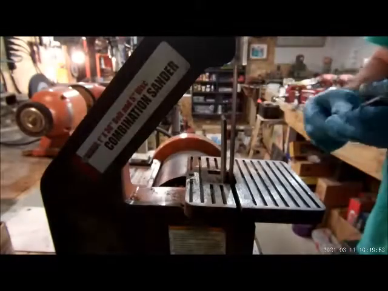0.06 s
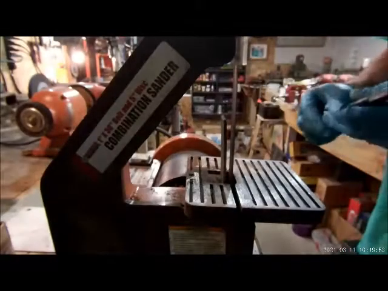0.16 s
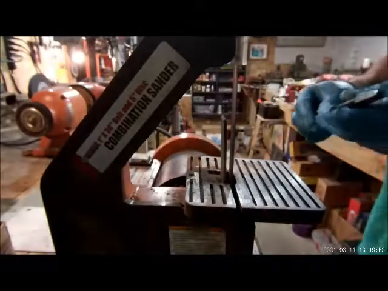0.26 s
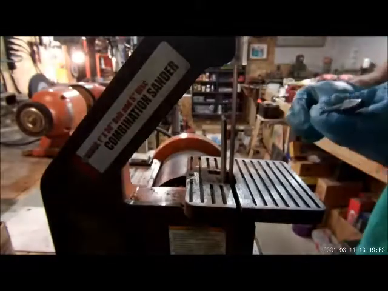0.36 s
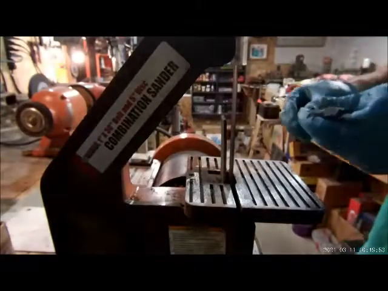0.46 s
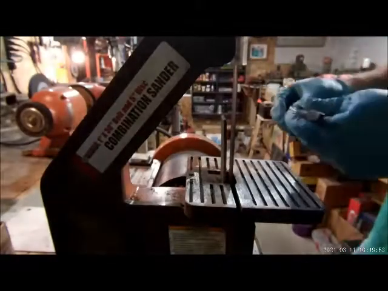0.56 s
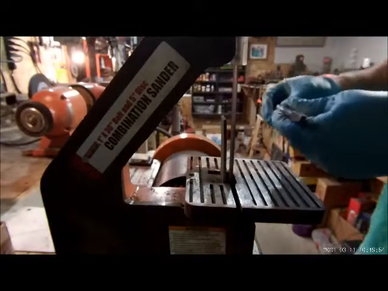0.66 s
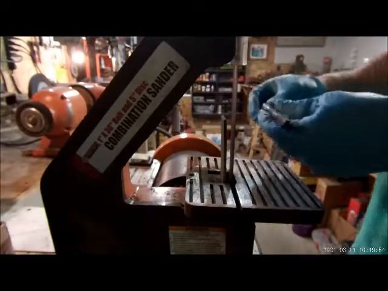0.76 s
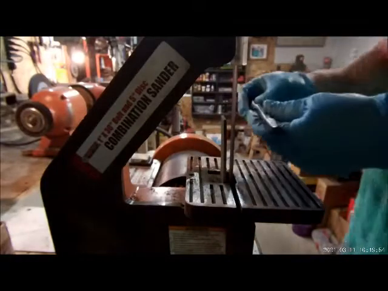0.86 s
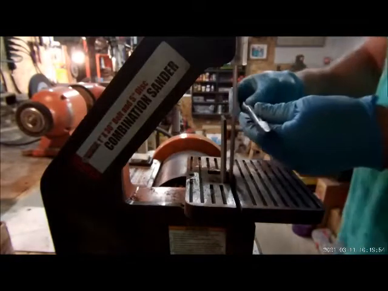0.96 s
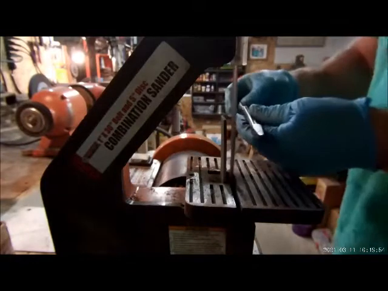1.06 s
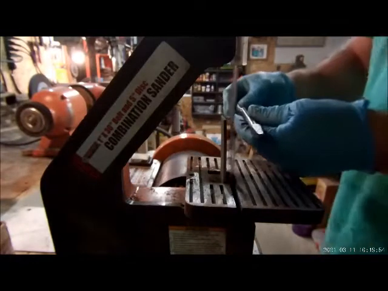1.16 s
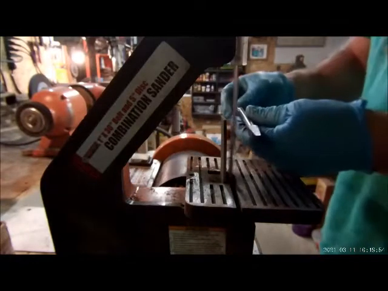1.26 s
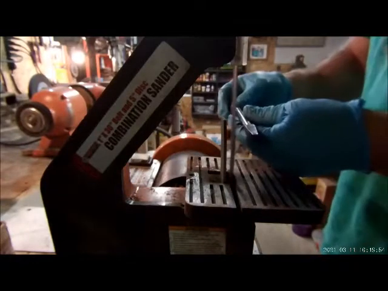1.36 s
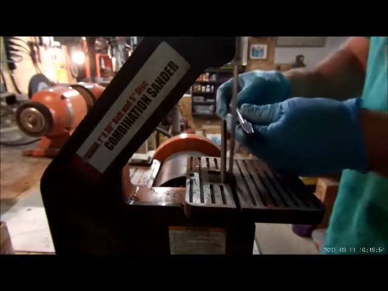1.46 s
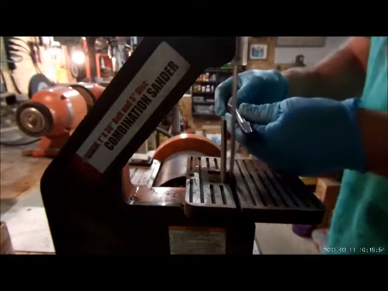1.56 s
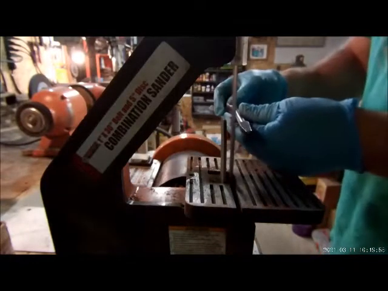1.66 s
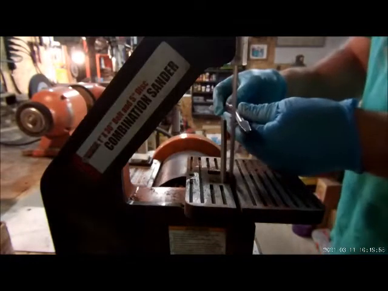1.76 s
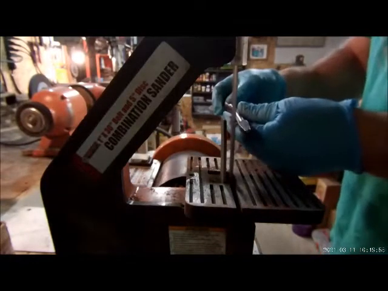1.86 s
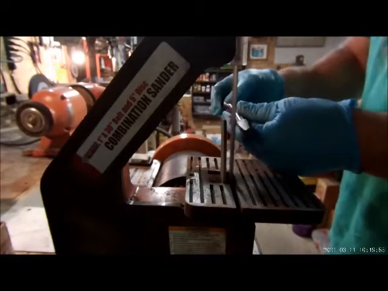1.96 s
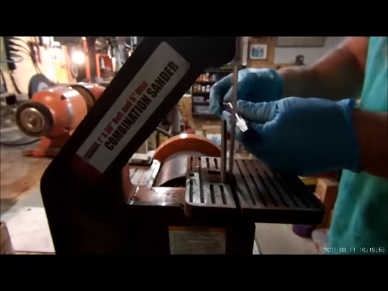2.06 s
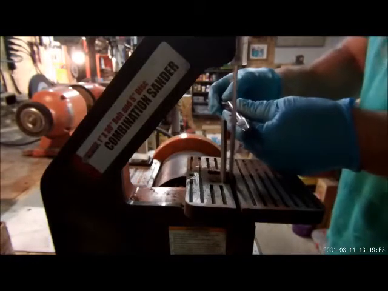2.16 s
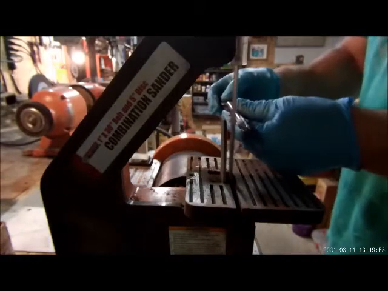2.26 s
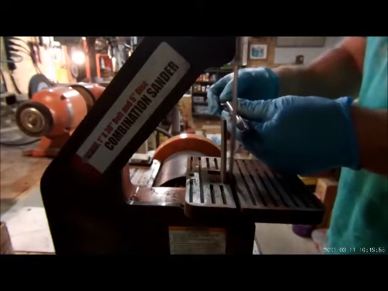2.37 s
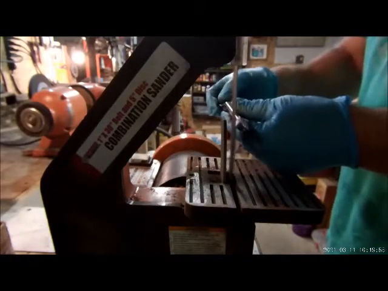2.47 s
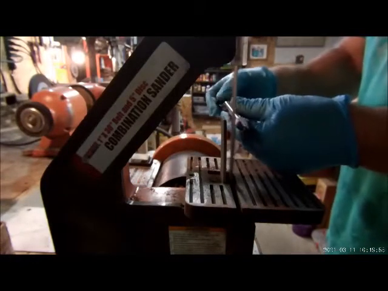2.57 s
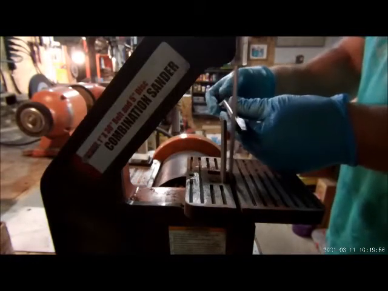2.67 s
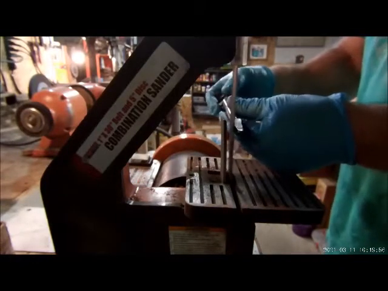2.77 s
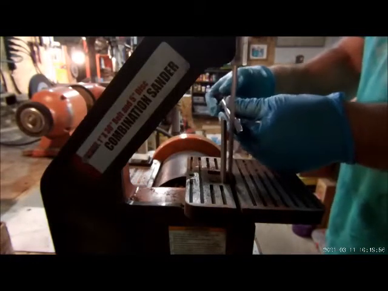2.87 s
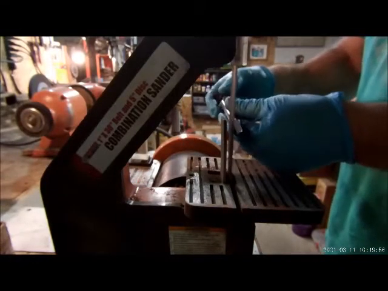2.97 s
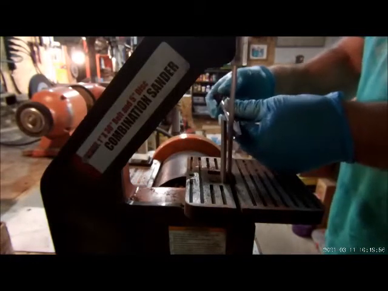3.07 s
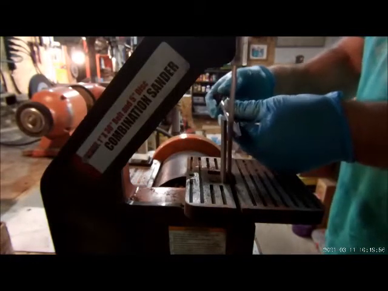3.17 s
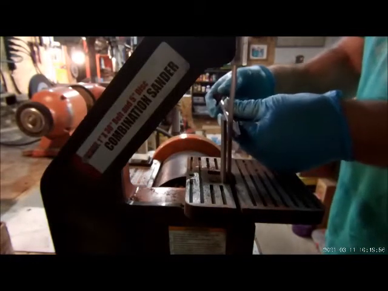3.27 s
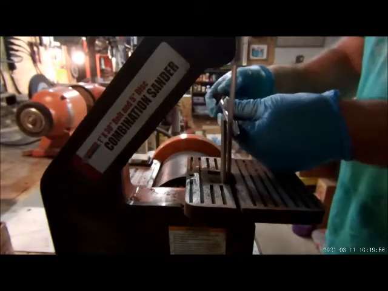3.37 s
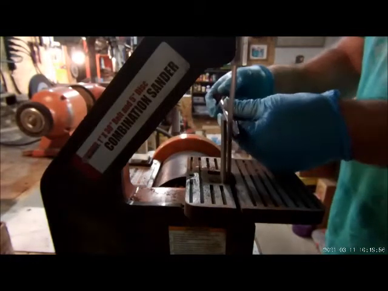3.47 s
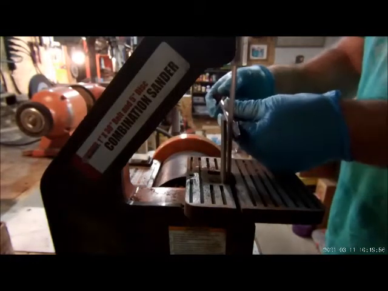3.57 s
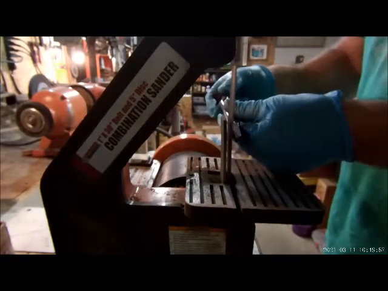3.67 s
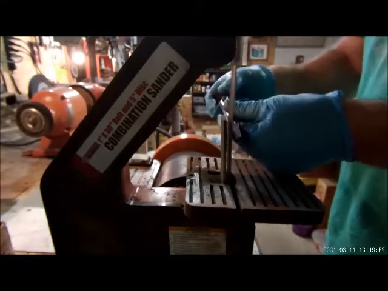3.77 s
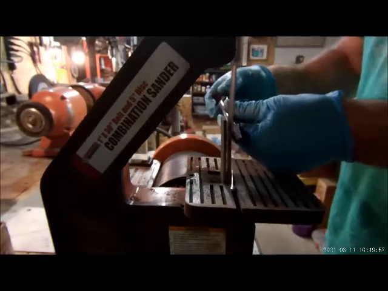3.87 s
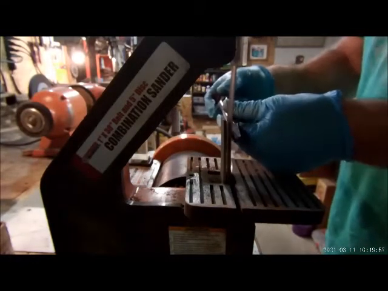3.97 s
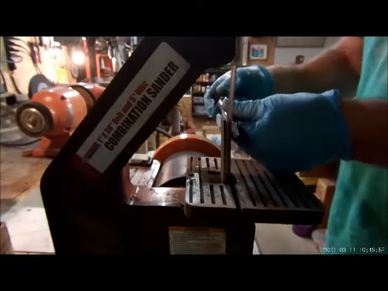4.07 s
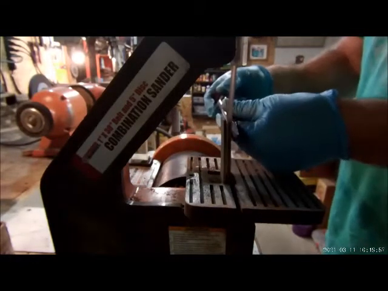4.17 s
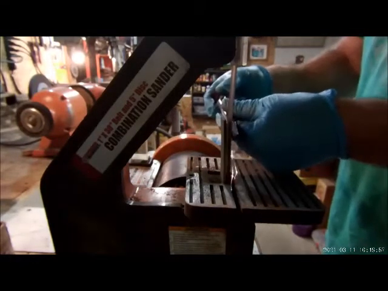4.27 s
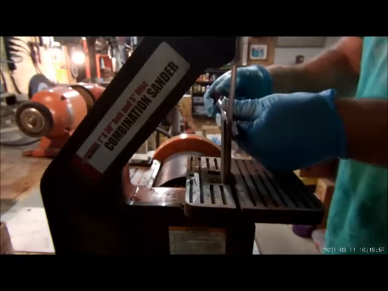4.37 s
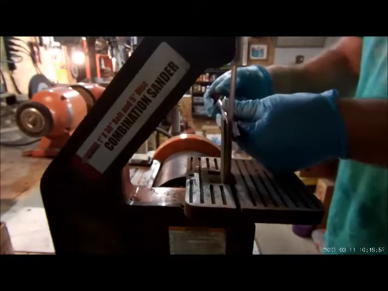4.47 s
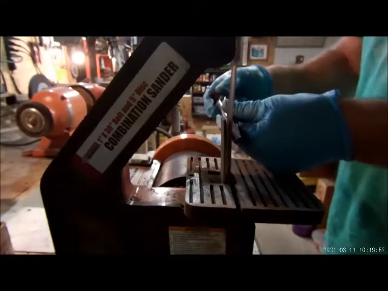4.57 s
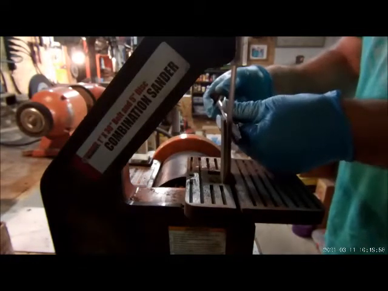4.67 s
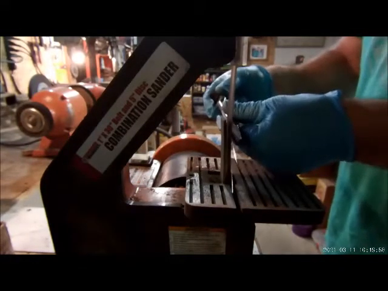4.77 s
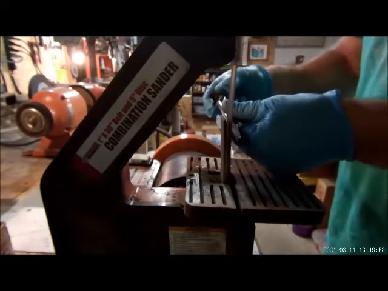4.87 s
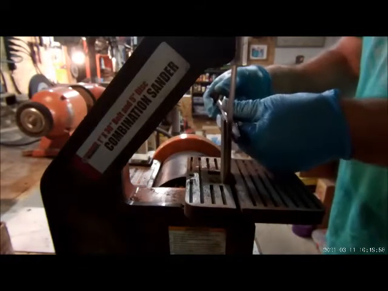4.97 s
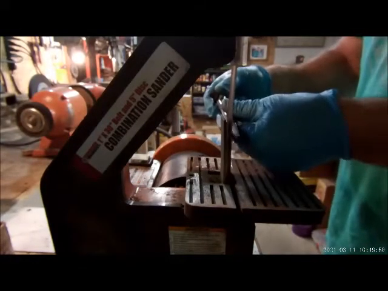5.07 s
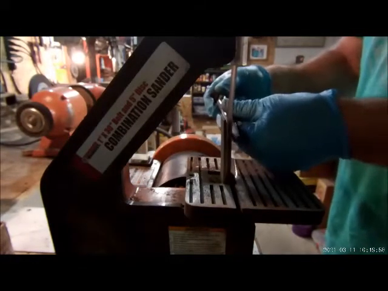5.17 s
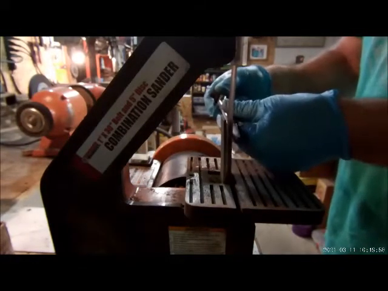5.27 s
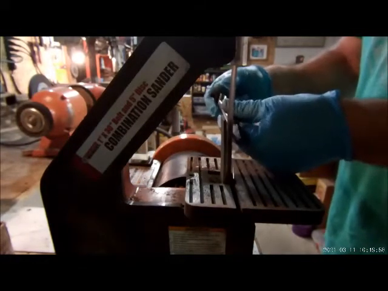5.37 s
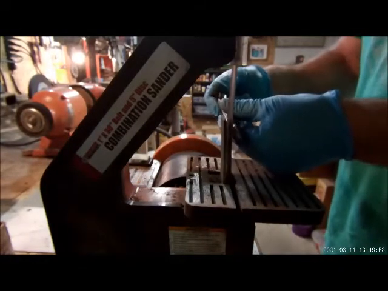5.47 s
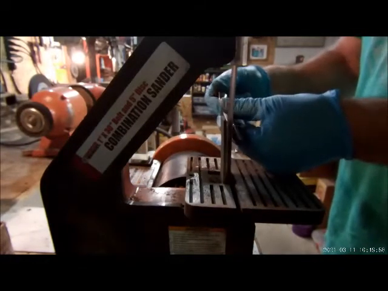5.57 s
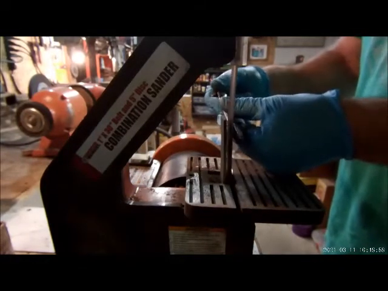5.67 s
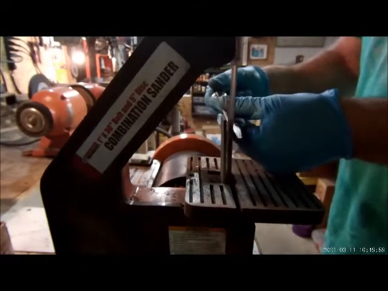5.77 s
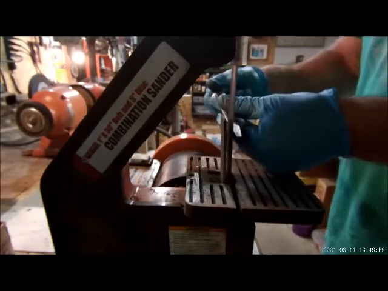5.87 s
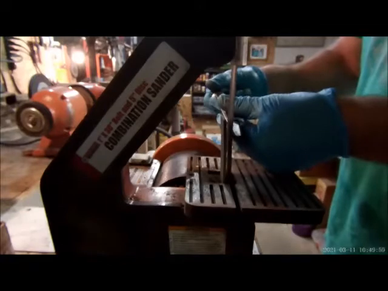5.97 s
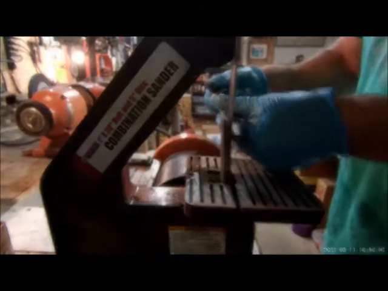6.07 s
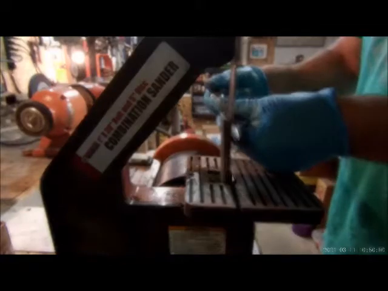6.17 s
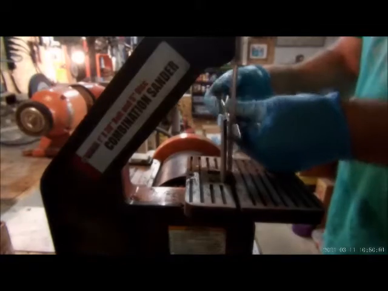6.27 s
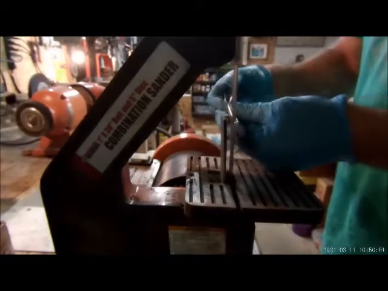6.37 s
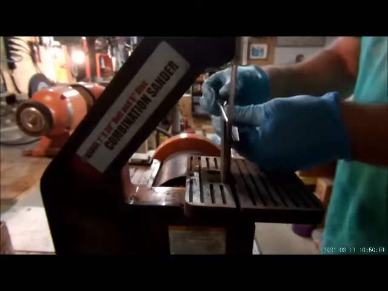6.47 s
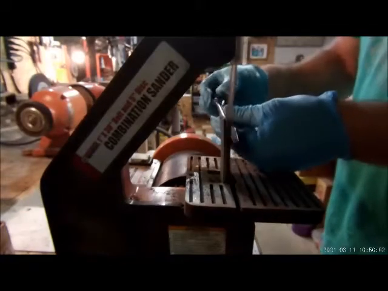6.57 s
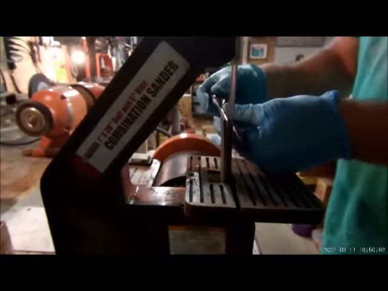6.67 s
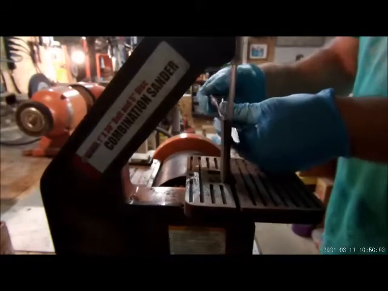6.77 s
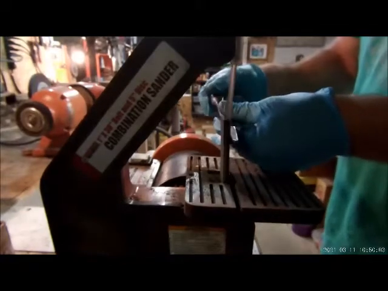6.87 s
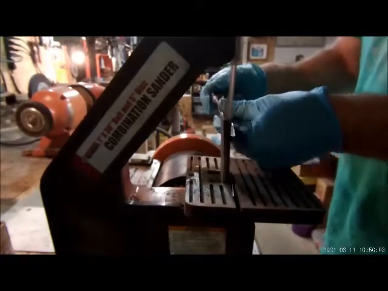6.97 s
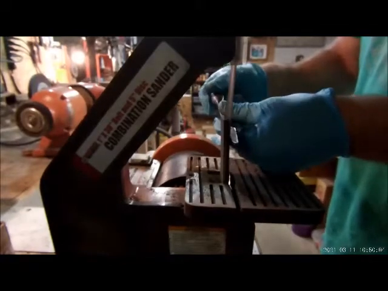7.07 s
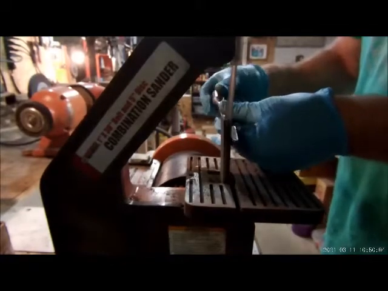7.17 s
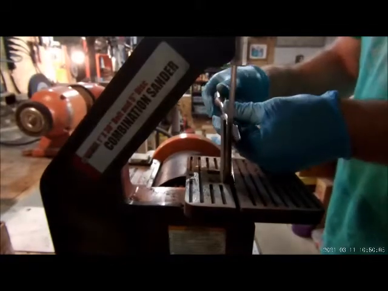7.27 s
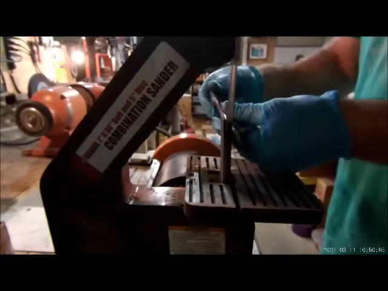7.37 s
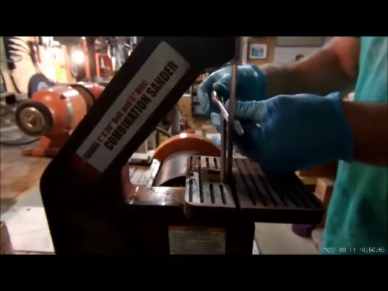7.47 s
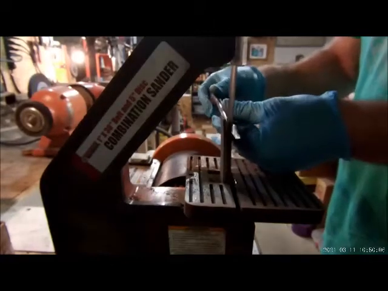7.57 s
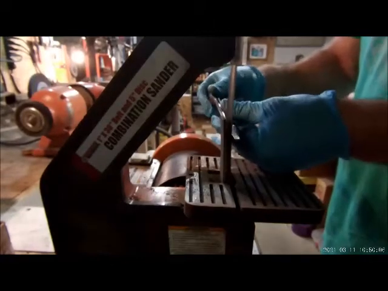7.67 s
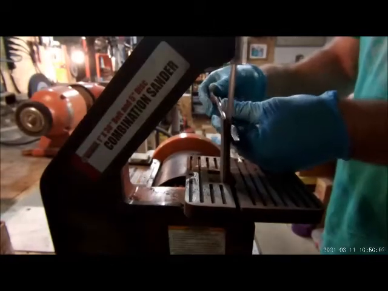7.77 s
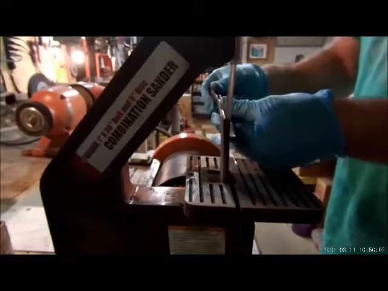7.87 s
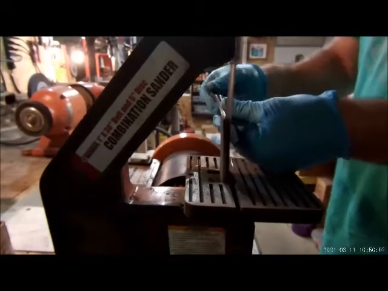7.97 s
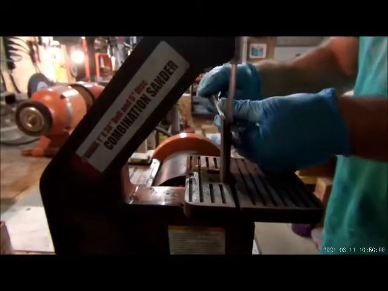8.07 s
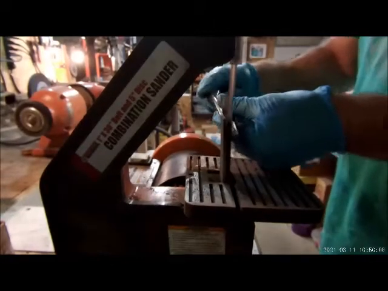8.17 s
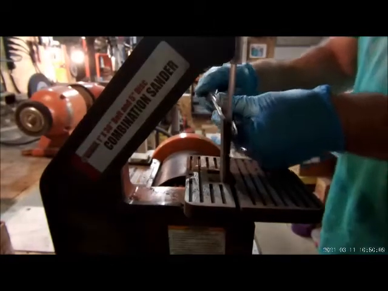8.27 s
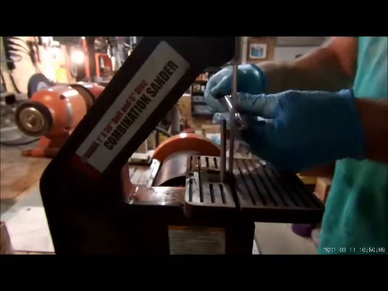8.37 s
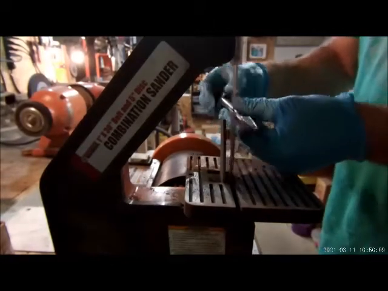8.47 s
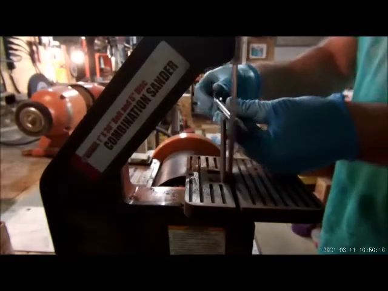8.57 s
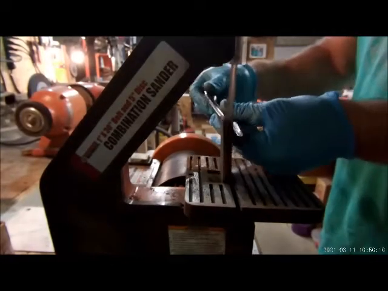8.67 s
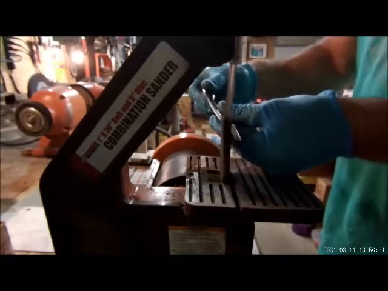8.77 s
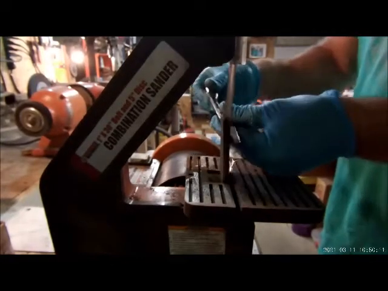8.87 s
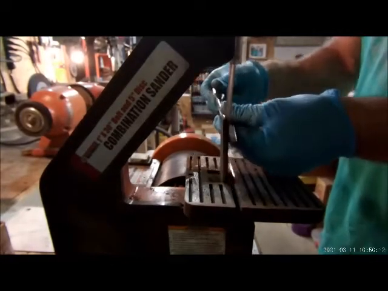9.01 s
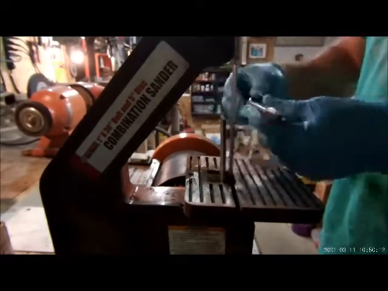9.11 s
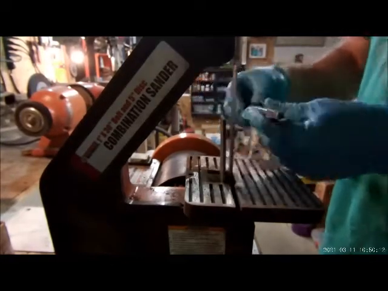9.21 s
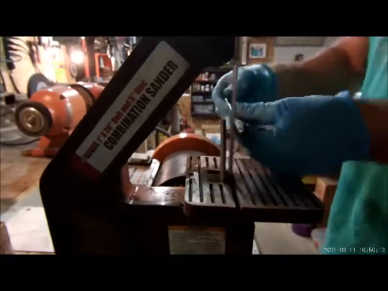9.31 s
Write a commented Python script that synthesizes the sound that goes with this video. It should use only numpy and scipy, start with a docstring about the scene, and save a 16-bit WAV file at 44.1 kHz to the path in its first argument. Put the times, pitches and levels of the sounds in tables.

```python
"""In a workshop, a benchtop belt and disc sander starts up. Its drive knocks once a turn, exciting the
frame's resonances, faster and faster until the knocks fuse into a rattling harmonic drone. The free
belt flaps briefly; then a steel shank is laid on it, loading the motor and hissing as grit scratches it.
Near the end the loaded machine is heard in fast motion, four times as quick and as high; the two
overlap for half a second, then the sound at natural pace is cut off."""
import sys
import numpy as np
from scipy import signal
from scipy.fft import rfft, irfft, next_fast_len
from scipy.io import wavfile

SR = 44100
rng = np.random.default_rng(int(sys.argv[2]) if len(sys.argv) > 2 else 0)


def write(x):
    x = np.atleast_2d(x).T
    wavfile.write(sys.argv[1], SR, np.round(np.clip(x, -1, 1) * 32767).astype(np.int16))


N = 411894
T = np.arange(N) / SR
PADDED = next_fast_len(N + SR // 2)
HZ = np.fft.rfftfreq(PADDED, 1 / SR)

FREE_HZ, LAPS_PER_TURN = 59.13, 1 / 8  # unloaded turning rate; belt laps per motor turn
FIRST_KNOCK_S, FUSE_S = 0.079, 1.188
FAST_PACE = 4


def amp(db):
    """Amplitude ratio of a level in decibels."""
    return 10 ** (np.asarray(db) / 20)


def unit(x):
    """Normalisation to rms 1."""
    return x / np.sqrt(np.mean(abs(x) ** 2) + 1e-20)


def curves(rows):
    """Linear interpolation of each column over time."""
    times, *columns = np.transpose(rows)
    return [np.interp(T, times, column) for column in columns]


def spectrum(points, hz):
    """Interpolation of levels [dB] on a logarithmic frequency axis."""
    frequencies, db = np.transpose(points)
    return np.interp(np.log(hz + 1), np.log(frequencies + 1), db)


def bell(hz, centre, width):
    """Lorentzian power response of one resonance."""
    return 1 / (1 + (2 * (hz - centre) / width) ** 2)


def radiation(corner_hz):
    """Radiation efficiency: a small body gives off little sound below its corner frequency."""
    return HZ ** 2 / (HZ ** 2 + corner_hz ** 2)


def coloured(x, gain):
    """Minimum-phase filtering, scaled so that white noise keeps its power."""
    cepstrum = irfft(np.log(np.maximum(unit(gain), 1e-6)), PADDED)
    cepstrum[1:PADDED // 2] *= 2
    cepstrum[PADDED // 2 + 1:] = 0
    return irfft(rfft(x, PADDED) * np.exp(rfft(cepstrum)), PADDED)[:N]


def wander(per_s):
    """Random modulation of rms 1, with per_s new values a second."""
    knots = np.arange(0, T[-1] + 1, 1 / per_s)
    return unit(np.interp(T, knots, rng.standard_normal(len(knots))))


def fade_in(centre_s, length_s):
    """Raised-cosine step from 0 to 1."""
    return .5 + .5 * np.sin(np.pi * np.clip((T - centre_s) / length_s, -.5, .5))


def motor_speed(load, pull_hz=16.58, surge_hz=19.15, sag_hz=0.52):
    """Turning rate [Hz]: torque pulls steadily, then surges; load (1 is normal) lowers the top speed."""
    return np.minimum(pull_hz * T + surge_hz * T ** 4, FREE_HZ - sag_hz * load)


# Spectral envelope of the frame: (frequency [Hz], level [dB])
FRAME_COLOUR = [(18, -75), (30, -67.5), (303, -31), (426, -18.5), (649, -7.5), (721, -13), (889, -0.5),
                (1130, -9.5), (2010, -8.5), (2480, -17), (3310, -22), (3580, -28.5), (5040, -51),
                (9220, -35), (16000, -77)]
# Resonances of housing and table: (frequency [Hz], bandwidth [Hz], gain [dB])
FRAME_RESONANCES = [(412, 13, 6.5), (522.5, 29, 10), (657.2, 17.4, 12.5), (708, 48, -8.5), (934, 20, 1.5),
                    (1023, 30, -2.5), (1152, 9.7, 1), (1661, 58, 7), (1970, 100, 5.5), (2480, 170, 3),
                    (3470, 140, 4.5), (3710, 280, 5.5), (4420, 120, 14)]

def frame_gain(pitch_ratio):
    """Modal response of the frame, with all frequencies scaled by pitch_ratio."""
    hz = HZ / pitch_ratio
    modes_db = sum(db * bell(hz, centre, width) for centre, width, db in FRAME_RESONANCES)
    return amp(spectrum(FRAME_COLOUR, hz) + modes_db)


# Spectral envelope of the belt's hiss: (frequency [Hz], level [dB])
HISS_COLOUR = [(3000, -1.5), (5200, -10), (6300, -4.5), (7400, -2), (8600, -6.5), (9150, 0), (9700, -5.5),
               (11000, -8), (13300, -9.5), (14100, -15), (14900, -6.5), (16000, -21)]

def belt_hiss(envelope):
    """Modulated noise radiated by the thin belt, which is efficient only in the treble."""
    noise = envelope * rng.standard_normal(N)
    return coloured(noise, amp(spectrum(HISS_COLOUR, HZ)) * radiation(2000))


# Tone of the belt's backing plate: (time [s], frequency [Hz], level [dB])
PLATE_TONE = [(0, 1660, -47), (.05, 1660, -62), (.1, 1690, -36), (.2, 1677, -40), (.3, 1691, -49),
              (.6, 1661, -34), (1.3, 1661, -31), (2.6, 1655, -26), (3.1, 1652, -32), (6.5, 1631, -41.5)]

def plate_singing(waver_hz=5, flutter_db=2):
    """Friction-driven vibration: the backing plate sings faintly at nearly one pitch."""
    hz, db = curves(PLATE_TONE)
    cycles = np.cumsum(hz + waver_hz * wander(60)) / SR
    return amp(db + flutter_db * wander(40)) * unit(np.sin(2 * np.pi * cycles))


def belt(speed, load, creep_db=-3.5):
    """Friction and air noise: the belt rubs on its plate and its grit hisses, both rising with speed."""
    decades = np.log10(np.maximum(speed, .5) / FREE_HZ)
    rub_db = -37 + 9.7 * decades - 10 * load
    air_db = -35.5 + 22.7 * decades + 2.9 * load
    slip_db = -23.5 + 18.5 * decades
    slipping = np.clip((FREE_HZ - speed) / 10, 0, 1) * (load == 0)  # only while pulled up to speed
    friction = np.hypot(amp(rub_db), amp(slip_db) * slipping) * amp(creep_db * (T < FIRST_KNOCK_S))
    rub = friction * coloured(rng.standard_normal(N), frame_gain(0.92))
    return rub + amp(air_db) * belt_hiss(1) + plate_singing()


def knocks(speed, full_db=-8.6, firm_hz=8.1, soft_db_per_hz=1.8, limp_db=-4.5):
    """Impulse train of the run-up: one blow a turn, softer at low speed, alternating at middle speed."""
    turns = np.cumsum(speed) / SR
    turn = np.floor(turns - turns[round(FIRST_KNOCK_S * SR)])
    limping = (turn % 2) * (speed > 24) * (speed < 46)
    db = full_db - soft_db_per_hz * np.maximum(firm_hz - speed, 0) + limp_db * limping
    return np.diff(turn, prepend=turn[0]) * amp(db) * (T < FUSE_S)


def clatter(blows, pace, burst_s, fade_s, room_db, room_t60):
    """Impacts set loose parts buzzing and the room reverberates; pace divides all the decay times."""
    t = np.arange(SR // 2) / SR * pace
    burst = np.exp(-t / fade_s) / (1 + (t / burst_s) ** 20)
    tail = amp(room_db - 60 * t / room_t60) ** 2
    power = signal.oaconvolve(blows ** 2, burst + tail)[:N]  # incoherent sounds add in power
    return coloured(np.sqrt(abs(power)) * rng.standard_normal(N), frame_gain(pace))


# Partials of the frame's ring and drone: (order [multiple of turning rate], relative level [dB])
HARMONICS = [(1, -64.5), (2, -46), (3, -37.5), (4, -42.5), (5, -29.5), (6, -25.5), (7, -9.5), (8, -16.5),
             (9, -39), (10, -10), (11, -15.5), (12, -11.5), (13, -5), (14, -65), (15, 5), (16, 3), (17, 3),
             (18, -2), (19, -39), (20, -2), (21, -6), (22, -20), (23, -6), (24, -7), (25, -11), (26, -1),
             (27, -4), (28, -6), (29, -34), (30, -12), (31, -5), (32, -10), (33, -23), (34, -7), (35, -19),
             (36, -10), (37, -23), (38, -13)]

def frame_ringing(blows, ring_s=0.014):
    """Impulse response: each blow briefly rings the partials of the full-speed drone."""
    t = np.arange(SR // 20) / SR
    phases = [(2 * np.pi * (k * FREE_HZ * t + rng.random()), db) for k, db in HARMONICS]
    ring = unit(sum(amp(db) * np.cos(phase) for phase, db in phases))
    ring /= np.sqrt(abs(signal.hilbert(ring)))  # evens out the envelope
    ring /= 1 + (t / ring_s) ** 10
    return coloured(signal.oaconvolve(blows, ring)[:N], radiation(260) ** 2)


def snaps(blows, decay_s=0.0026):
    """Damped transients: each blow draws a short bright snap from the belt."""
    decay = np.exp(-np.arange(SR // 20) / SR / decay_s)
    return belt_hiss(signal.oaconvolve(blows, decay)[:N])


def start_up(speed, buzz_db=-10, ring_db=-8, snap_db=-25, snap_spread_db=3):
    """Impact excitation: ever closer knocks each buzz, ring the frame and snap the belt."""
    blows = knocks(speed)
    ring = frame_ringing(blows)
    buzz = clatter(blows, pace=0.97, burst_s=0.012, fade_s=0.019, room_db=-5, room_t60=0.22)
    snap = snaps(blows * amp(snap_db + snap_spread_db * wander(30.08)))
    return amp(buzz_db) * buzz + amp(ring_db) * ring + snap


def drone(harmonics, turns, pace, flutter=0.19):
    """Periodic knocks form a harmonic series; the frame's dispersion delays each partial differently."""
    orders = np.transpose(harmonics)[0]
    delay_turns = .48 * rng.random(len(orders)) - .12 * np.cos(.5 * (orders - 16))
    tone = np.zeros(N)
    for (k, db), lag in zip(harmonics, np.cumsum(delay_turns)):  # group delay sums to phase lag
        tone += amp(db) * (1 + flutter * wander(12 * pace)) * np.cos(2 * np.pi * (k * turns - lag))
    return unit(tone)


def machine(load, harmonics, pace, drone_db, clatter_db, jitter_turns=.003, lap_db=-.36, uneven_db=.43):
    """Forced vibration: a knock a turn gives drone and clatter, swayed by belt laps, damped by load."""
    turns = np.cumsum(pace * motor_speed(load)) / SR + jitter_turns * wander(25 * pace)
    lap = 2 * np.pi * LAPS_PER_TURN * turns
    force = amp(lap_db * (np.sin(lap) + np.sin(3 * lap)) + uneven_db * wander(40 * pace))
    blows = np.diff(np.floor(turns), prepend=0) * force * amp(clatter_db - 3.5 * load)
    rattle = clatter(blows, pace, burst_s=0.016, fade_s=0.013, room_db=-14, room_t60=0.38)
    return rattle + drone(harmonics, turns, pace) * force * amp(drone_db - 2.5 * load)


# Spells of flapping of the free belt: (start [s], duration [s], level [dB])
FLAP_SPELLS = [(1.867, .19, -25.5), (2.122, .75, -29.5)]

def flapping(chirp_hz=4430, chirp_width_hz=150, chirp_db=-11):
    """Subharmonic motion: the belt snaps on every second turn, with a small metallic chirp."""
    blows = np.zeros(N)
    for start, length, db in FLAP_SPELLS:
        times = np.arange(start, start + length, 2 / FREE_HZ)
        blows[np.round(times * SR).astype(int)] = amp(db)
    snap = snaps(blows)
    return snap + amp(chirp_db) * coloured(snap, bell(HZ, chirp_hz, chirp_width_hz))


# Strength of the steel's contact with the belt: (time [s], level [dB])
CONTACT_LEVEL = [(2.74, -41.5), (2.87, -23), (3.14, -18), (3.53, -17), (3.62, -19.5), (3.88, -16),
                 (4.56, -18), (4.74, -15), (5.35, -17), (5.61, -15), (5.99, -21), (6.12, -19.5),
                 (6.51, -17), (6.52, -22)]

def contact():
    """Amplitude envelope of the grinding, from the moment the steel touches the belt."""
    return amp(curves(CONTACT_LEVEL)[0]) * fade_in(CONTACT_LEVEL[0][0], .04)


# Spectral envelope of grit scratching steel: (frequency [Hz], level [dB])
SCRATCH_COLOUR = [(3000, -25.5), (4400, -13), (4950, -13.5), (5300, -14), (6400, -3), (7000, -1),
                  (9000, -0.5), (11500, -1.5), (13500, -0.5), (14100, -5.5), (15000, 1.5), (16000, -8.5)]
# Peaks and dips in the grinding hiss, the shank's ringing and a notch near 4.2 kHz:
# (frequency [Hz], bandwidth [Hz], gain [dB])
GRIND_PEAKS_AND_DIPS = [(4160, 220, -16), (5280, 220, 15.5), (5430, 100, -13), (5756, 160, 11.5),
                        (6300, 160, -5), (6870, 210, 7), (7190, 170, 8), (7400, 120, -0.5), (8000, 79, 3.5),
                        (7860, 80, -3), (7890, 80, 5), (9280, 110, 2.5), (9020, 73, 0), (9170, 100, 4.5),
                        (9490, 360, 10.5), (9570, 115, -18.5), (10260, 90, -4), (10300, 90, -3),
                        (10370, 270, 7), (10370, 90, -6), (11030, 320, 7.5), (11640, 150, -2),
                        (12000, 80, -4), (13900, 200, 4), (14950, 250, 3.5)]

def grinding_filter(scratches, ripple_hz=59.85, ripple_db=2.37):
    """Spectral shaping: broad peaks and dips, plus a random ripple of the shank's narrow resonances."""
    knots = np.arange(0, SR / 2 + ripple_hz, ripple_hz)
    ripple = unit(np.interp(HZ, knots, rng.standard_normal(len(knots))))
    shape_db = sum(db * bell(HZ, centre, width) for centre, width, db in GRIND_PEAKS_AND_DIPS)
    colour_db = spectrum(SCRATCH_COLOUR, HZ) + shape_db + ripple_db * ripple
    return coloured(scratches, amp(colour_db) * radiation(2500))


def grinding(speed, gain_db=0.5, grit_db=1.5, flutter_db=1.1, flutter_per_turn=0.4):
    """Abrasion noise: countless grains scratch the shank, fluttering periodically as the belt moves."""
    cycles = flutter_per_turn * np.cumsum(speed) / SR
    flutter = unit(sum(np.cos(2 * np.pi * (k * cycles + rng.random())) for k in range(1, 11)))
    bite_db = flutter_db * flutter + grit_db * wander(2500)
    scratches = unit(amp(bite_db) * rng.standard_normal(N))
    return grinding_filter(scratches * contact() * amp(gain_db))


def fast_belt(load, plate_hz=1655, waver_hz=8, hiss_hz=13500, hiss_width_hz=4000, lap_db=3):
    """Transposition: the plate sings two octaves up by a hiss; both surge each lap, fade under load."""
    laps = LAPS_PER_TURN * np.cumsum(FAST_PACE * motor_speed(load)) / SR
    surge_db = lap_db * np.sin(2 * np.pi * laps) + wander(60)
    cycles = np.cumsum(FAST_PACE * (plate_hz + waver_hz * wander(240))) / SR
    sing = amp(-28 - 8 * load) * unit(np.sin(2 * np.pi * cycles))
    hiss_gain = bell(HZ, hiss_hz, hiss_width_hz) * HZ ** 2
    hiss = amp(-41 - 3 * load) * coloured(rng.standard_normal(N), hiss_gain)
    return amp(surge_db) * (sing + hiss)


# The hand bears down (+) or eases (-): (start [s], duration [s], change [normal loads], gain [dB])
HAND_PRESSES = [(6.24, 0.065, 0.124, -2.5), (6.351, .18, -.8, -1), (6.599, 0.049, 0.41, -2),
                (6.784, .04, 0.44, -1.5), (7.392, 0.081, 0.22, -2), (7.588, 0.038, 0.23, -1.5),
                (7.65, 0.31, -.1, 0.5), (8.019, 0.12, 0.75, -0.5), (8.426, .33, -.6, 0),
                (8.842, .28, 0.84, 2), (9.122, 0.41, -0.69, -0.5)]

def presses(rise_s=0.038):
    """Superposition of the hand's presses on a normal load; gives load and gain [dB] in fast motion."""
    load, db = np.ones(N), np.zeros(N)
    for start, length, change, gain_db in HAND_PRESSES:
        held = fade_in(start, rise_s) - fade_in(start + length, rise_s)
        load += change * held
        db += gain_db * held
    return load, db


# Partials of the drone in fast motion: (order [multiple of turning rate], relative level [dB])
FAST_HARMONICS = [(1, -66), (2, -49), (3, -40), (4, -43), (5, -30.5), (6, -26.5), (7, -11), (8, -22),
                  (9, -17), (10, -11), (11, -16.5), (12, -11.5), (13, -7), (14, -21), (15, 4), (16, 1),
                  (17, 2.5), (18, -1.5), (19, -10), (20, -2.5), (21, -6), (22, -13), (23, -9), (24, -5),
                  (25, -13), (26, -2), (27, -2.5), (28, -10.5), (29, -27), (30, -12.5), (31, -6),
                  (32, -9.5), (33, -32), (34, -5.5), (35, -15), (36, -9.5), (37, -37), (38, -11)]

def fast_motion(tremble, swell_hz=1.4, crest_s=6.5, swell_db=0.23):
    """Time compression raises rate and pitch of the loaded machine alike; its level swells slightly."""
    load, press_db = presses()
    load += tremble * wander(5 * FAST_PACE)
    swell = amp(press_db + swell_db * np.cos(2 * np.pi * swell_hz * (T - crest_s)))
    running = machine(load, FAST_HARMONICS, FAST_PACE, drone_db=-17.5, clatter_db=-17.92)
    return swell * (running + fast_belt(load))


def scene(normal_contact_db=-16, tremble=0.142, ease_s=5.88, eased=0.301, fast_s=6.022, cut_s=6.523):
    """Superposition: the work at natural pace is overlapped, then replaced, by fast motion."""
    load = contact() / amp(normal_contact_db) * (1 + tremble * wander(5))  # the hand trembles a little
    load *= 1 - eased * fade_in(ease_s, .1)
    speed = motor_speed(load)
    running = machine(load, HARMONICS, pace=1, drone_db=-18.3, clatter_db=-18.93) * fade_in(FUSE_S, .02)
    natural = start_up(speed) + belt(speed, load) + running + flapping() + grinding(speed)
    natural *= 1 - fade_in(cut_s, 0.0013)
    return (natural + fast_motion(tremble) * fade_in(fast_s, .004))[None]


def record(dry, ceiling=.92, edge_hz=15790):
    """Hard clipping of the rare highest peaks, then a steep low-pass filter."""
    low_pass = signal.firwin(2047, edge_hz, window=("kaiser", 9), fs=SR)
    return signal.oaconvolve(np.clip(dry, -ceiling, ceiling), low_pass[None], "same")


dry = scene()
out = record(dry)
write(out)
```